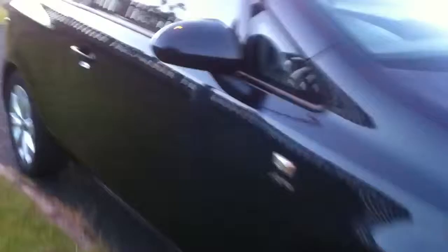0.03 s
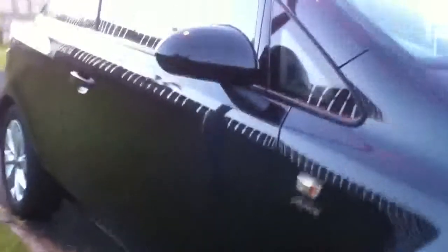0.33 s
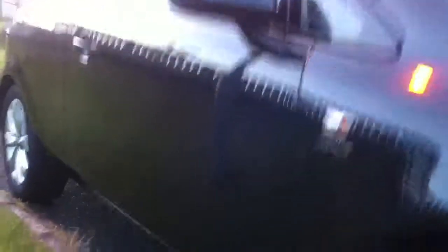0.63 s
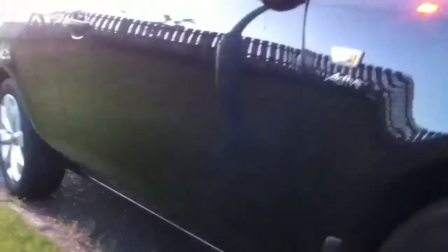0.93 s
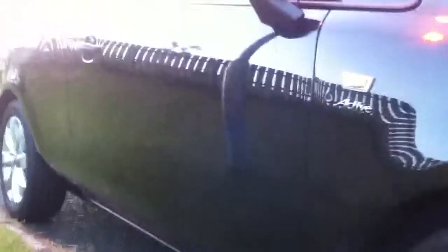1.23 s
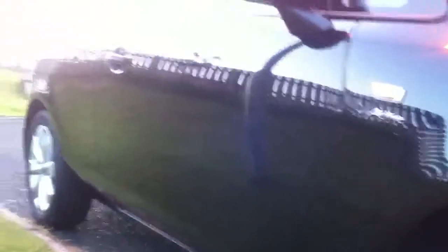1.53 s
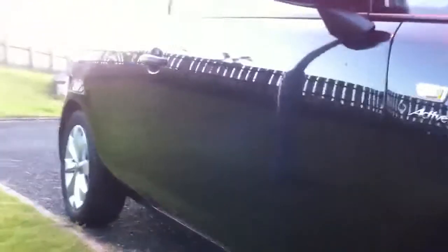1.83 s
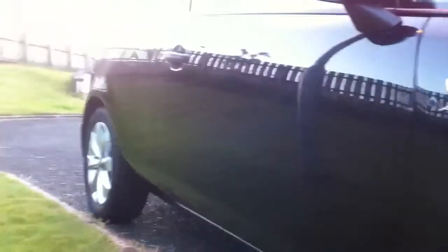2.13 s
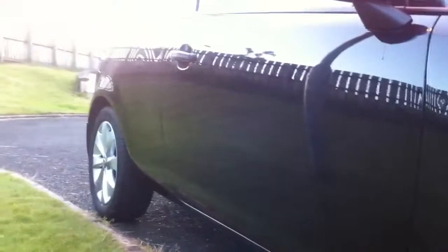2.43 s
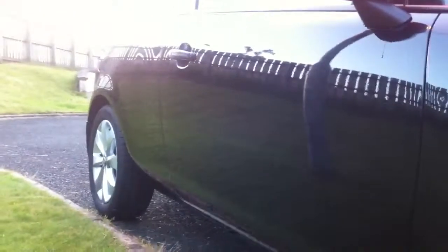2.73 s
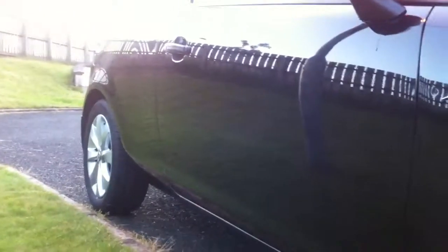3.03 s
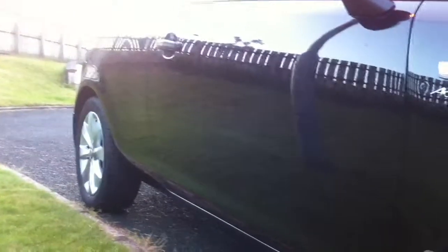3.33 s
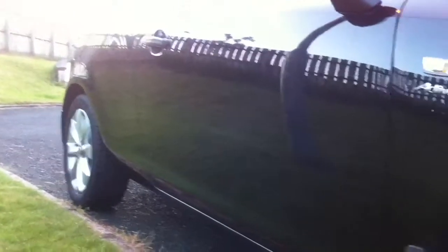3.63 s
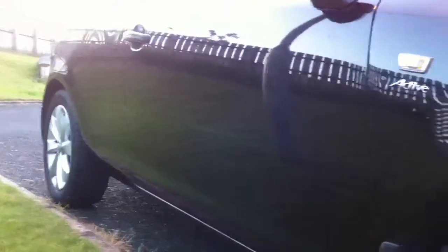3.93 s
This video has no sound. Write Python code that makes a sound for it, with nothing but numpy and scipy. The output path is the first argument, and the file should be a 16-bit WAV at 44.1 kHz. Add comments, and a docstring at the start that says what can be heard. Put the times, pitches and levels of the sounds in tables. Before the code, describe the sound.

A far vehicle rumbles closer, growing deeper and booming in short swells with faint tyre noise. Early on, fingers softly knock and brush the microphone. Distant traffic, a low machine hum and hiss continue quietly outdoors.

```python
"""Outdoors beside a parked car, a far vehicle draws nearer.
Its rumble grows, deepens and booms in short swells, and its tyre noise sinks in pitch.
Fingers knock softly on the camera, which rings briefly, and a sleeve and fingers brush it.
Behind all this lie the murmur of distant traffic, a steady low machine hum
and the microphone's own hiss."""
import sys
import numpy as np
from scipy import signal
from scipy.fft import rfft, irfft
from scipy.io import wavfile

SR = 44100
rng = np.random.default_rng(int(sys.argv[2]) if len(sys.argv) > 2 else 0)


def wrap_up_sound(samples):
    """Save the sound to the file named by the first command line argument, as 16-bit audio."""
    columns = np.atleast_2d(samples).T
    # keep every value between -1 and 1, then stretch to whole-number steps
    tamed = np.clip(columns, -1, 1)
    steps = np.round(tamed * 32767).astype(np.int16)
    wavfile.write(sys.argv[1], SR, steps)


N = 176400  # 4 seconds


def undb(db):
    """Turn decibels into a number to multiply by."""
    return 10 ** (np.asarray(db) / 20)


def curve(table, column=1):
    """Join one column of a time table with straight lines."""
    rows = np.array(table, float)
    return np.interp(np.arange(N) / SR, rows[:, 0], rows[:, column])


def shaped(gain):
    """Noise of typical size 1, with each frequency weighted by `gain`."""
    x = irfft(rfft(rng.standard_normal(N)) * gain, N)
    return x / np.std(x)


def noise(colour):
    """Noise of typical size 1; the colour table says which frequencies are stronger."""
    hz, db = np.array(colour, float).T
    log_hz = np.log(np.fft.rfftfreq(N, 1 / SR) + 1)
    return shaped(undb(np.interp(log_hz, np.log(hz), db)))


def drift(rate_hz):
    """A smooth random wobble of typical size 1; a higher rate makes it quicker."""
    return shaped(np.exp(-.5 * (np.fft.rfftfreq(N, 1 / SR) / rate_hz) ** 2))


def bump(at, length):
    """A smooth rise and fall around one moment."""
    return np.exp(-2 * ((np.arange(N) / SR - at) / length) ** 2)


def phase_of(hz):
    """How far a wave has turned, in radians, as its frequency moves."""
    return 2 * np.pi * np.cumsum(hz) / SR


# colour of the rumble and of its deep part: f/Hz, relative level/dB
RUMBLE_COLOUR = [(60, -32), (100, -25), (130, -16.5), (165, -2.5), (220, 0), (270, -2.5), (330, -12.5),
                 (420, -22.5), (550, -26), (700, -24.5), (1100, -29), (1500, -46), (2500, -67)]
BASS_COLOUR = [(25, -34), (42, -29), (60, -29), (75, -18), (90, -6), (105, 8.5), (135, 5.5), (165, -4.5),
               (230, -44)]
# how loud each is over time: t/s, level/dB
RUMBLE_LEVEL = [(0, -88), (.8, -66.5), (1.0, -59), (1.45, -61.5), (1.85, -52.5), (2.3, -52), (2.85, -50),
                (3.25, -49.5), (3.48, -51), (3.65, -50.5), (3.8, -56), (4, -49.5)]
BASS_LEVEL = [(0, -85), (1.3, -75.5), (1.8, -68.5), (2.5, -67.5), (2.9, -58), (3.35, -59), (3.66, -53.5),
              (3.8, -57), (3.93, -54.5), (4, -61)]
def rumble(waver_db=1):
    """The far vehicle's rumble grows and then deepens as it nears, wavering on the air."""
    body = noise(RUMBLE_COLOUR) * undb(curve(RUMBLE_LEVEL))
    bass = noise(BASS_COLOUR) * undb(curve(BASS_LEVEL))
    return (body + bass) * undb(waver_db * drift(3.9))


# booms in the rumble: t/s, length/s, f/Hz, level/dB
SWELLS = [(2.857, .06, 263, -48.5), (3.025, 0.052, 162.6, -47), (3.092, .06, 264, -51.5),
          (3.176, 0.058, 280, -51), (3.36, 0.046, 230.7, -47), (3.562, 0.059, 221, -41),
          (3.937, 0.074, 204, -43.5)]
def swells(wander_hz=9.57):
    """For a moment, one low, unsteady note of the rumble booms out and fades."""
    out = np.zeros(N)
    for at, length, hz, db in SWELLS:
        boom = np.sqrt(2) * np.sin(phase_of(hz + wander_hz * drift(35)))
        out += undb(db) * boom * bump(at, length)
    return out


# middle pitch and loudness of the tyre noise: t/s, f/Hz, level/dB
TYRES = [(0, 920, -77), (2.1, 920, -76.5), (2.45, 920, -69.5), (2.57, 920, -60.5), (2.68, 890, -69.5),
         (2.8, 860, -62.5), (2.95, 810, -68.5), (3.25, 760, -67), (3.6, 840, -67.5), (4, 840, -69)]
def tyres(width_hz=105):
    """Rolling tyres make a narrow band of noise that comes up and sinks in pitch."""
    phase = phase_of(curve(TYRES))
    # two quick wobbles smear the tone into noise
    band = drift(width_hz) * np.cos(phase) + drift(width_hz) * np.sin(phase)
    return band * undb(curve(TYRES, column=2))


# finger knocks: t/s, level/dB
KNOCKS = [(.302, -54), (.908, -52), (.932, -47.5), (.956, -46), (1.062, -50)]
# notes the camera rings with: f/Hz, relative level/dB, time to fade by 60 dB/s
CAMERA_NOTES = [(240, -6, .05), (680, -7, .025), (900, 0, .024), (1100, -7, .015), (2900, -22, .008)]
def knocks(attack_s=.0004, low_cut_hz=171):
    """Fingers shift on the camera body, which rings very briefly."""
    t, out = np.arange(N) / SR, np.zeros(N)
    for at, db in KNOCKS:
        age = np.maximum(t - at, 0)
        push = 1 - np.exp(-age / attack_s)  # a fingertip is soft
        for hz, note_db, ring_s in CAMERA_NOTES:
            detune = 1 + 0.062 * rng.standard_normal()
            ring = np.sin(2 * np.pi * hz * detune * age)
            fade = np.exp(-np.log(1000) * np.minimum(age / ring_s, 10))
            out += undb(db + note_db) * push * ring * fade
    return signal.sosfilt(signal.butter(2, low_cut_hz, "highpass", fs=SR, output="sos"), out)


# rubs on the camera: t/s, length/s, level/dB
SCUFFS = [(0.323, 0.055, -73), (.945, 0.062, -59.5), (1.078, 0.06, -59.5)]
# colour of a rub: f/Hz, relative level/dB
SCUFF_COLOUR = [(100, -27), (250, 14), (420, -16), (540, -13), (680, 0), (930, -3.5), (1150, -12),
                (1600, -24), (3200, -34), (6000, -40)]
def scuffs(grain_db=3):
    """A sleeve and fingers brush the camera in short, dull, uneven rubs."""
    pressure = sum(undb(db) * bump(at, length) for at, length, db in SCUFFS)
    return noise(SCUFF_COLOUR) * pressure * undb(grain_db * drift(70))


# colour of the traffic: f/Hz, relative level/dB
TRAFFIC_COLOUR = [(20, -23.5), (33, -45), (45, -33.5), (70, -22.5), (90, -14), (115, -3.5), (160, 0.5),
                  (230, 1.5), (290, -5), (390, -1.5), (470, -7.5), (550, -14), (650, -9.5), (780, -14.5),
                  (1000, -15), (1250, -23.5), (1500, -24.5), (2000, -35), (4000, -47.5)]
def traffic(level_db=-56.5):
    """Distant roads blend into a dull, steady murmur."""
    return noise(TRAFFIC_COLOUR) * undb(level_db)


# tones in the hum: multiple of the lowest pitch, level/dB
HUM_TONES = [(1, -75.5), (4, -69.5), (8, -74.5), (16, -78), (19, -80.5), (27, -90.5)]
def hum(pitch_hz=53.46, wander=0.0029, flutter_db=1.5):
    """A machine at steady speed makes a low tone and a few higher ones, all gently fluttering."""
    phase = phase_of(pitch_hz * (1 + wander * drift(3.62)))
    out = np.zeros(N)
    for multiple, db in HUM_TONES:
        strength = np.sqrt(2) * undb(db - flutter_db * drift(1.9))
        out += strength * np.sin(multiple * phase + rng.uniform(0, 2 * np.pi))
    return out


def scene():
    """All the sounds add up at one microphone."""
    return (traffic() + rumble() + swells() + tyres() + hum() + knocks() + scuffs())[None]


# colour of the microphone's hiss: f/Hz, relative level/dB
HISS_COLOUR = [(100, 1), (2000, 0.5), (3200, 0), (5000, -1), (8000, -3), (9500, -4), (10800, -6),
               (12500, -4), (14500, -2), (16000, -4.5)]
def record(dry, hiss_db=-71.5, fade_s=.004, top_hz=15850):
    """The microphone adds its hiss; both ends fade quickly and the highest treble is cut."""
    t = np.arange(N) / SR
    hissy = dry + undb(hiss_db) * noise(HISS_COLOUR)
    fade = np.minimum(np.minimum(t, t[::-1]) / fade_s, 1)
    treble_cut = signal.ellip(12, .1, 70, top_hz, fs=SR, output="sos")
    return signal.sosfilt(treble_cut, hissy * fade)


dry = scene()
out = record(dry)
wrap_up_sound(out)
```